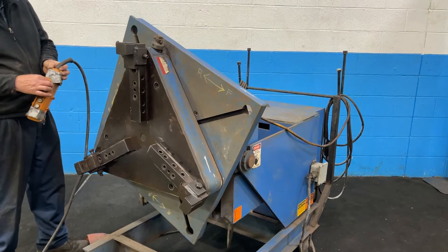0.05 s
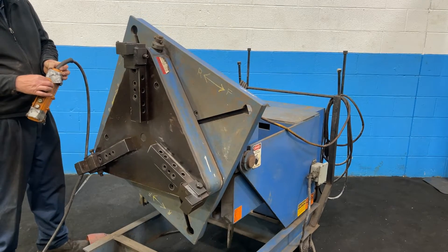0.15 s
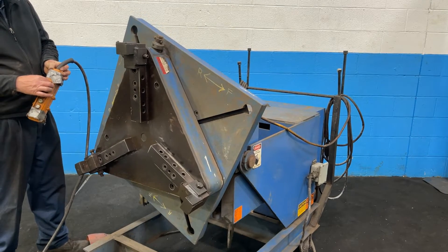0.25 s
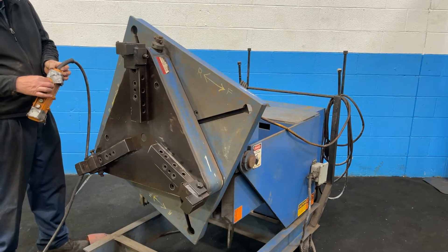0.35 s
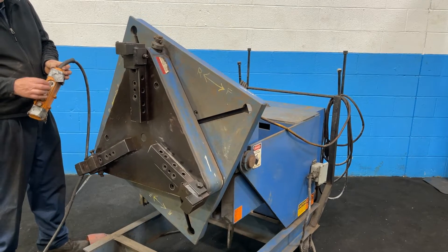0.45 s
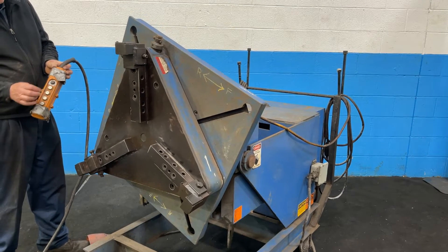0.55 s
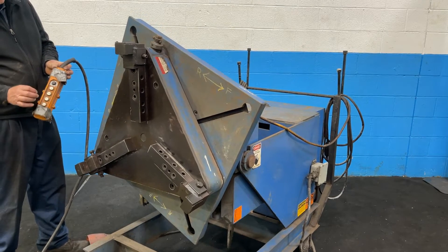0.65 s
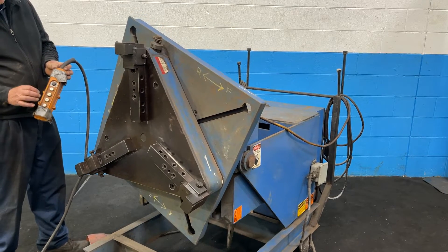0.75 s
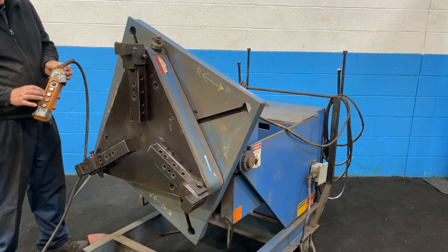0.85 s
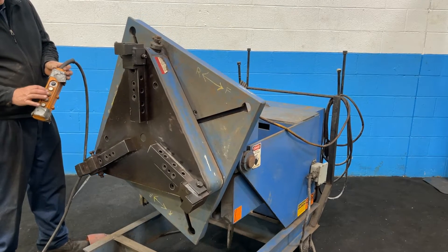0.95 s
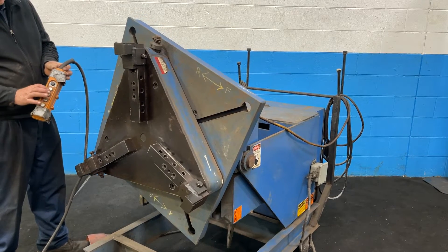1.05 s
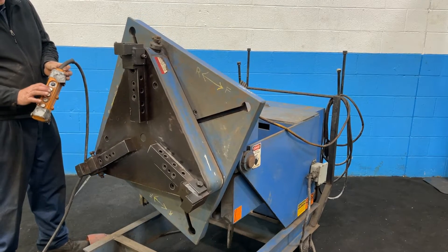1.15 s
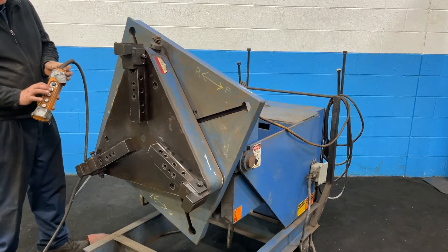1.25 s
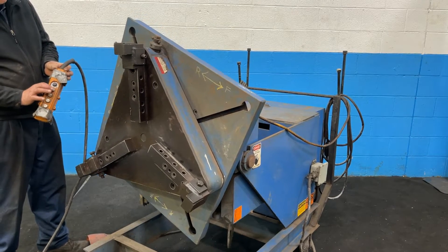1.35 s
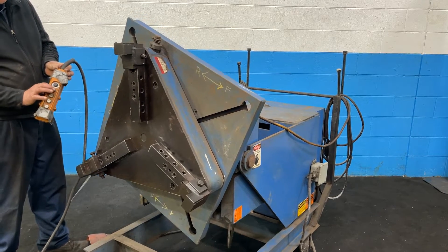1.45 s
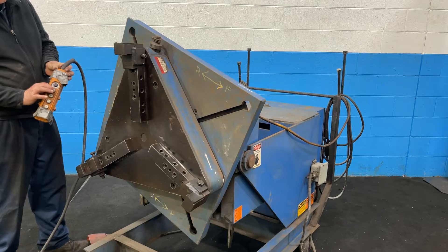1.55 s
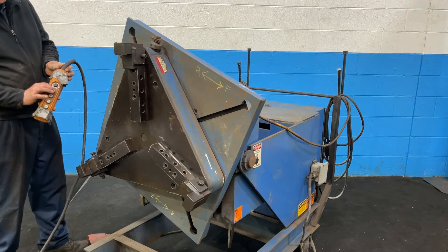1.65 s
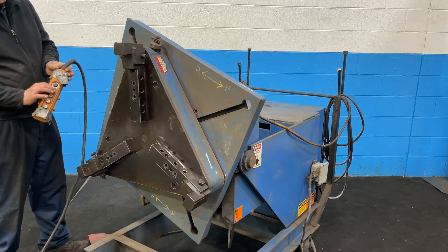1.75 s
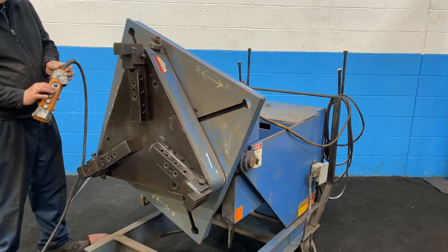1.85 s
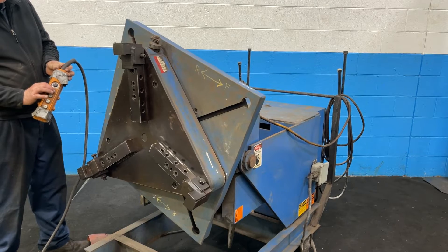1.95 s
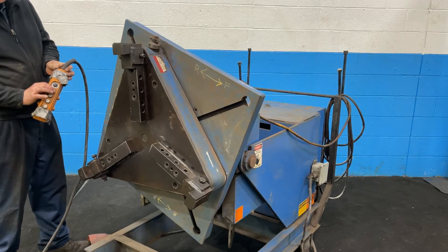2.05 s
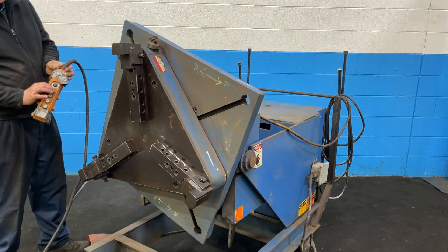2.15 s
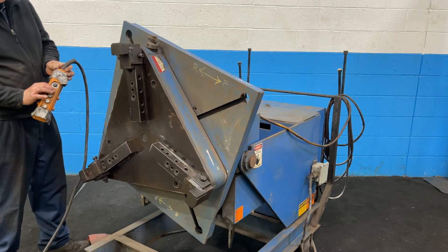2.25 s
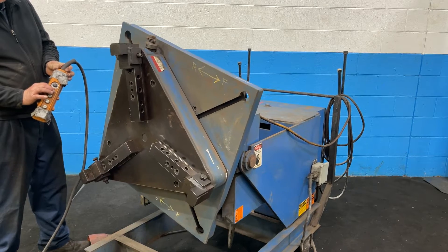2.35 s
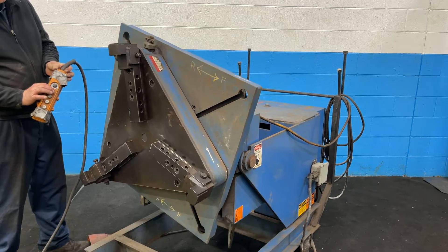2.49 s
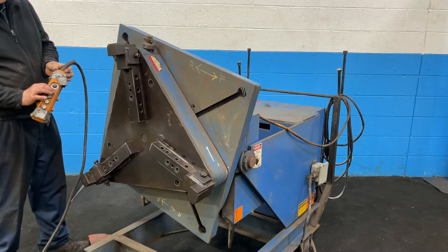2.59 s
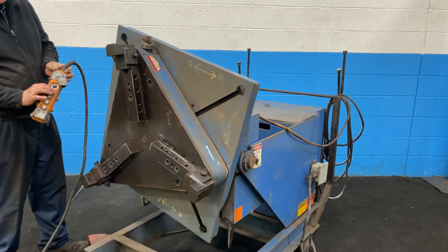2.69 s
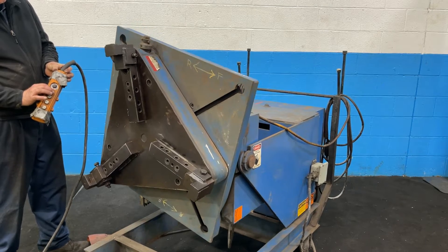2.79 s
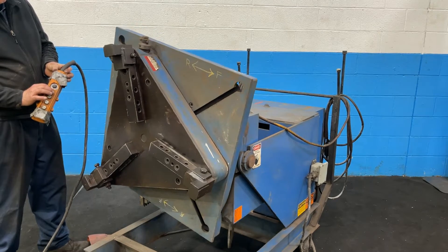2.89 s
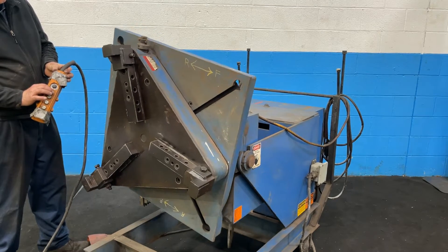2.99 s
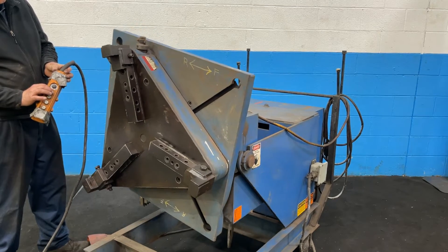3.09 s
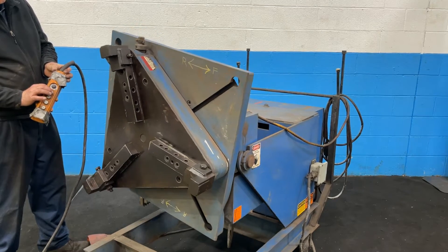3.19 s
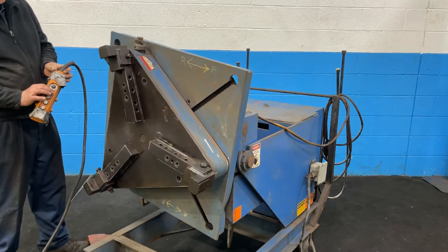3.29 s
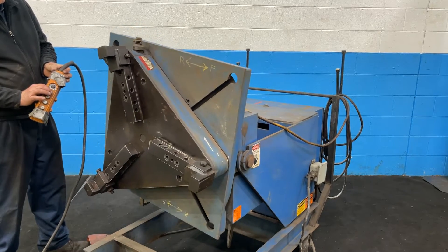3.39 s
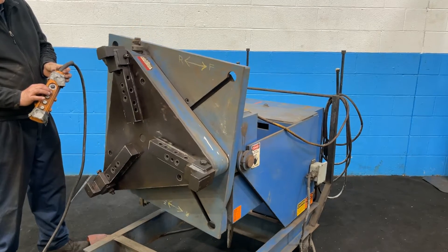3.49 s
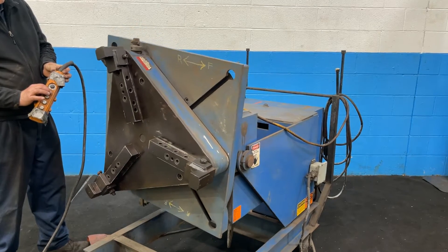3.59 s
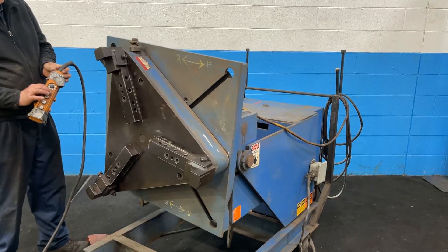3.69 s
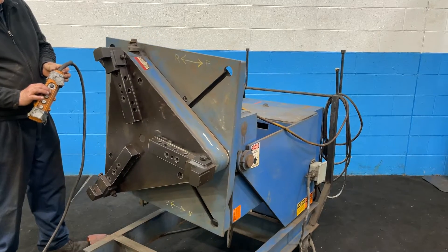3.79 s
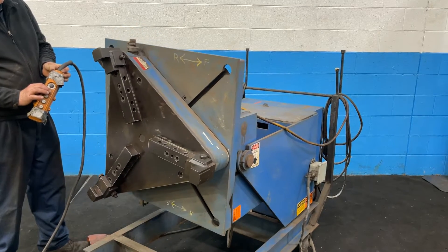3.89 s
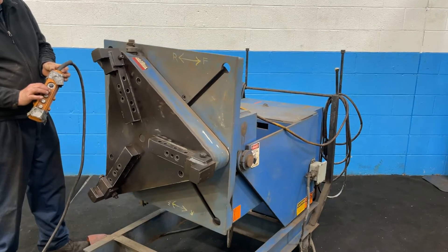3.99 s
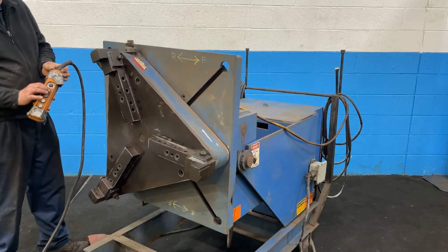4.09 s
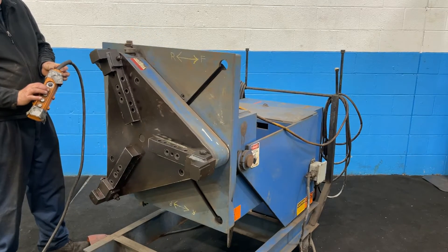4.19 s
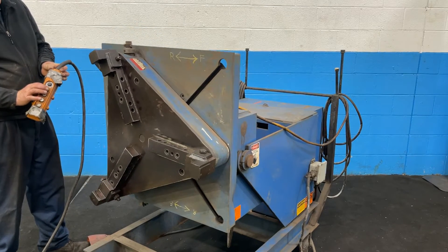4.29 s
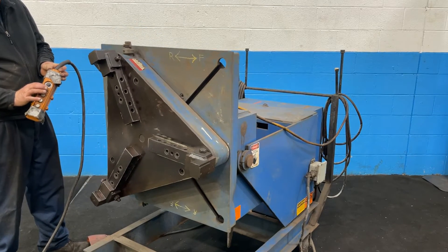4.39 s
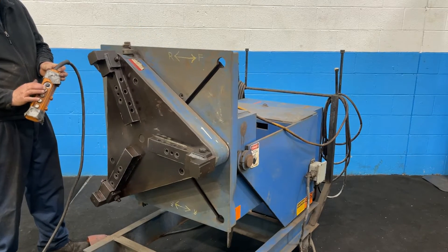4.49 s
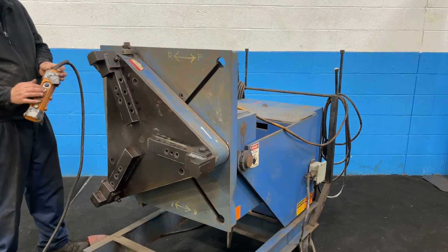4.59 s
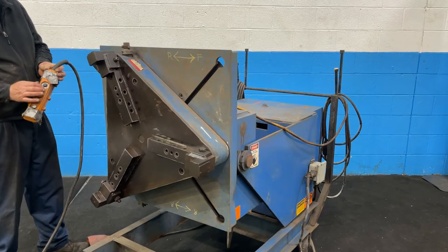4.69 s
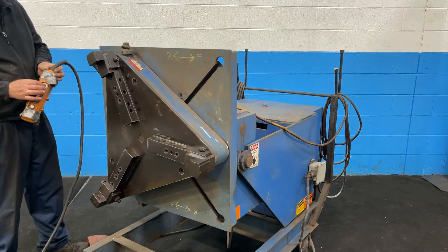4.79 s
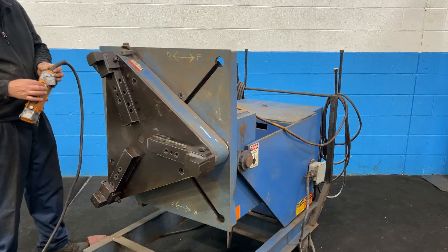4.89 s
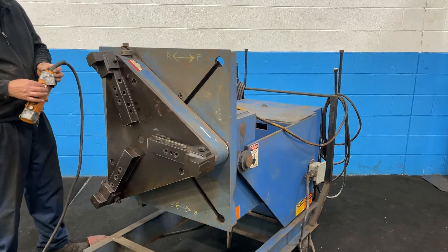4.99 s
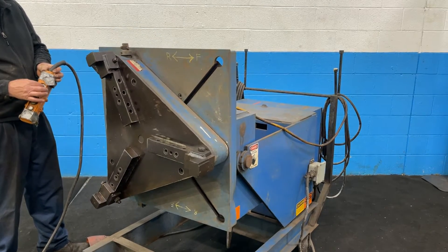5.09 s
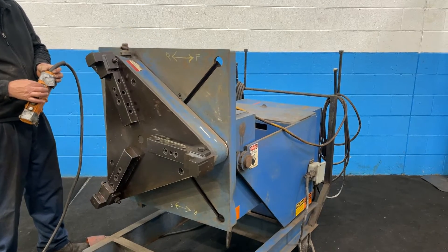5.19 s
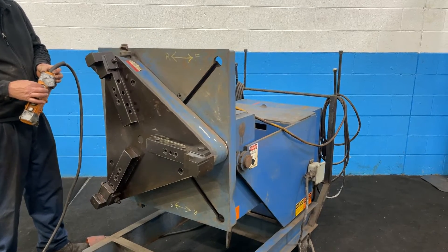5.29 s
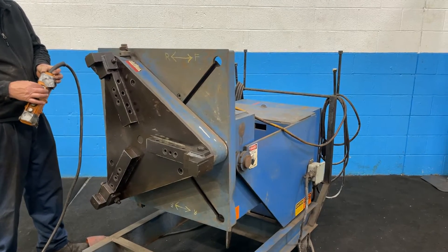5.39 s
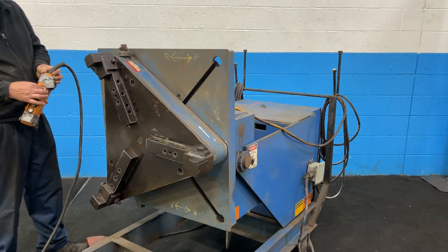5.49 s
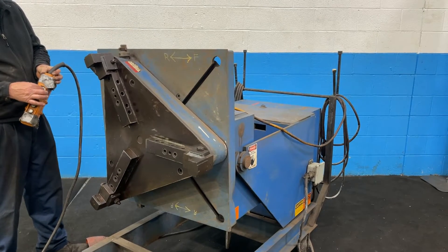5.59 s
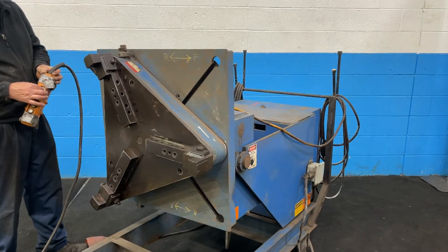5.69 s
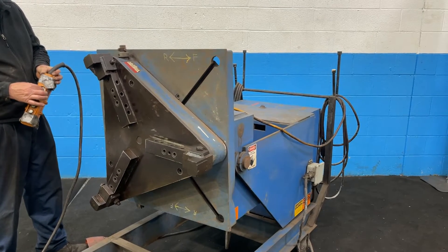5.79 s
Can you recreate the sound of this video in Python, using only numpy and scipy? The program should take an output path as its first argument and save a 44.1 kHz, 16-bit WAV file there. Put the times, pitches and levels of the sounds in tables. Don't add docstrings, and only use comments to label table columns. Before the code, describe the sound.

Close to a stereo microphone in a hard-walled workshop, a motor drive hums low and steady over soft hall rumble. Faint air hiss and thin distant squeaks come early. After a small click the gears whine upward, metal chatter swells and holds steady, then the pitch slides down and the rattle fades to idle hum.

```python
import sys
import numpy as np
from scipy import signal
from scipy.fft import rfft, irfft, next_fast_len
from scipy.io import wavfile
from scipy.ndimage import uniform_filter1d

SR = 44100
rng = np.random.default_rng(int(sys.argv[2]) if len(sys.argv) > 2 else 0)


def boost(x):
    u = np.asarray(x, float) / 20
    return 10 ** u


def to_wav(sig):
    pcm = np.clip(np.atleast_2d(sig), -1, 1) * 32767
    pcm = np.round(pcm).astype(np.int16)
    wavfile.write(sys.argv[1], SR, pcm.T)


N = 257975
T = np.arange(N) / SR
SIZE = next_fast_len(N + SR)
HZ = np.arange(SIZE // 2 + 1) * SR / SIZE + 1e-3

# (time [s], level of the first ripple line [dB])
RIPPLE = [(0, -41), (1.6, -40.5), (1.69, -37.5), (1.82, -34.5), (1.9, -29.5), (2.25, -30.5), (2.32, -35),
          (2.41, -31), (4.2, -32.5), (4.28, -41), (4.5, -54), (4.92, -57.5), (4.975, -33.5), (5.005, -33.5),
          (5.045, -49), (5.1, -37), (5.2, -42), (5.85, -40.5)]
# (multiple of the ripple rate, level re first line [dB])
BUZZ = [(4, -19.5), (5, -37.5), (7, -41), (10, -55), (11, -31), (12, -33), (13, -32.5), (14, -31.5),
        (15, -30.5)]
# (time [s], level over idle [dB])
CONTACT_FORCE = [(0, 1), (.6, 1.5), (1.1, -1.8), (1.6, 1.5), (1.69, 6), (1.87, 14), (2.1, 18.5), (2.3, 22),
                 (2.85, 23), (4.2, 21.5), (4.3, 18.5), (4.43, 14), (4.71, 5.5), (4.87, 1), (5.0, 1.6),
                 (5.85, 0.3)]
# (idle level [dB], rise per force [dB/dB], extra while gears are loose [dB],
# unevenness at rest [dB], unevenness under load [dB])
CASING_PARTS = [
    (-53, 0.895, 8.5, 1, 1.8),
    (-51.5, 0.8719, 5.5, 1.4, 0.86),
    (-53.5, 1.0349, 0.9, 1.5, 0.65),
]
# (frequency [Hz], width [Hz], level [dB])
FRAME_RINGS = [(94, 34, -8), (166, 19, -15), (249.8, 22, 5), (312, 41, -2.5), (394, 26, -3.5),
               (412, 104, -3.5), (481, 16, -7), (516, 62, 1), (553, 60, -6.5)]
# (frequency [Hz], width [Hz], level [dB])
HOUSING_RINGS = [(657, 21, -6), (718, 17, -1), (746, 19, 0), (769, 5.4, 3), (799, 6.7, 8), (840.5, 7.4, 1),
                 (920, 22, -11), (943, 53, -8.5), (1006, 37, -12.5), (1038, 18, -8), (1105, 28, -15),
                 (1205, 34, -18.5), (1314, 15, -15), (1410, 17, -18)]
# (frequency [Hz], width [Hz], level [dB])
COVER_RINGS = [(2770, 70, -11), (2905, 40, -13), (3090, 30, -17), (3190, 30, -6), (3280, 50, -13),
               (3510, 40, -11), (3642, 25, -2), (3715, 40, -3), (3762, 25, 1), (3817, 25, 1),
               (3930, 70, -10), (4080, 30, -15), (4210, 30, -17), (4420, 80, -12), (4510, 51, -16),
               (4650, 50, -18), (4740, 50, -16), (5445, 110, -16), (5742, 35, -15), (6030, 30, -17),
               (6136, 25, -12), (8220, 50, -15), (8322, 40, -14), (8470, 60, -14), (8660, 60, -12),
               (8810, 45, -11), (9160, 30, -13), (9420, 50, -15)]
# (frequency [Hz], level per Hz [dB])
CONTACT_HISS = [(1000, -42), (1400, -25.5), (2300, -26), (2800, -16.5), (4300, -20), (4950, -22),
                (7300, -25.5), (8500, -17), (9400, -19.5), (10400, -19.5), (11000, -29.5), (12300, -34.5),
                (12700, -44), (14000, -60)]
# (frequency [Hz], level per Hz [dB])
HALL_SPECTRUM = [(15, -45), (28, -29), (55, -6), (100, -6.5), (180, -11.5), (400, -18.5), (800, -20.5),
                 (1300, -34), (2300, -31.5), (5000, -38.5), (9000, -41), (10500, -39), (11500, -56),
                 (14000, -70)]
# (time [s], level [dB], centre [Hz], width [Hz], 60 dB decay [s])
PUFFS = [
    (0.243, -49.5, 9100, 3000, 0.66),
    (.26, -50.5, 1100, 2300, 0.66),
    (0.25, -50, 7000, 1400, 0.23),
    (5.8, -52.5, 8300, 1500, 0.69),
    (1.585, -47, 7700, 7400, 0.062),
    (1.66, -61, 7000, 8000, .08),
    (4.95, -62, 6000, 7000, 0.09),
]
# (time [s], length [s], start [Hz], end [Hz], level [dB])
SQUEAKS = [
    (0.354, .2, 13180, 13160, -62),
    (0.491, 0.13, 10550, 9140, -43),
    (0.551, 0.19, 9320, 9170, -45.5),
    (0.577, .17, 4650, 4620, -55),
    (0.6, 0.184, 8650, 8100, -57),
    (1.39, 0.27, 3710, 3743, -50.5),
    (1.394, 0.51, 7430, 7500, -66),
]
# (time [s], gear tooth rate [Hz])
TOOTH_RATE = [(1.64, 99.95), (1.8, 187.6), (1.95, 249.7), (2.06, 303.8), (2.23, 383), (2.44, 451.8),
              (2.55, 475), (2.72, 480.9), (3.04, 482), (3.8, 481), (4.19, 481.7), (4.23, 462.8),
              (4.28, 407.2), (4.36, 337.7), (4.48, 271.5), (4.7, 174), (4.82, 120)]
# (tooth rate [Hz], width [Hz], level [dB])
WHINE_SWELLS = [(248, 14, -27.5), (304, 22, -27), (388, 40, -28), (430, 40, -34), (480, 24, -19.2)]
# (frequency [Hz], width [Hz], level [dB])
OCTAVE_SWELLS = [(810, 50, -35), (840, 51, -40)]
# (time [s], dip [dB], length [s])
WHINE_DIPS = [(2.138, 9, .02), (2.203, 17, .02), (2.51, 16, .04), (2.655, 9, 0.012), (2.785, 13, .025),
              (2.874, 4, .02), (4.24, 18, 0.014), (4.34, 12, .02), (4.444, -1, 0.013), (4.514, 18, 0.016),
              (4.63, 5, .045)]
# (multiple of tooth rate, level re steady whine [dB])
GEAR_TONES = [(.29, -26), (0.62, -23), (.667, -34), (1.365, -31), (1.451, -32), (1.59, -22), (1.667, -19),
              (1.955, -23), (2.667, -34.5)]
# (frequency [Hz], correlation)
PORT_LIKENESS = [(60, .98), (500, .97), (750, .78), (2400, .66), (3300, .72), (3800, .92), (4300, .65),
                 (5000, .4), (6900, .2), (8500, .99), (9200, .8), (10250, 1), (11200, .55), (11750, 1)]
# (frequency [Hz], level [dB])
PORT_BALANCE = [(60, 16.5), (130, -2.5), (250, -2.5), (480, 2.5), (750, -3.5), (1100, 2.5), (2500, -1),
                (3300, 1), (4000, -1), (6700, 4), (8000, 1.5), (9000, 1)]
# (frequency [Hz], phase [rad])
PORT_LEAD = [(60, 0), (500, -.2), (750, .8), (1400, 0), (2200, .1), (3100, 1.1), (4100, .4), (4900, 2.2),
             (5600, .6), (7800, .9), (8600, 0), (10250, -np.pi), (11000, -4.3), (11700, -2 * np.pi)]
# (frequency [Hz], threshold [dB])
TREBLE_GATE = [(7900, -130), (8000, -102), (10000, -100.5), (12000, -89.5), (13500, -82)]


def unit(x):
    return x / np.sqrt(np.mean(x ** 2))


def curve(table):
    return np.interp(T, *np.transpose(table))


def over_hz(table):
    hz, value = np.transpose(table)
    return np.interp(np.log(HZ), np.log(np.maximum(hz, 20)), value)


def shape(x, response):
    return irfft(rfft(x, SIZE) * response, SIZE)[..., :N]


def walk(rate):
    k = int(SR / rate)
    steps = np.repeat(rng.standard_normal(N // k + 1), k)
    slewed = uniform_filter1d(uniform_filter1d(steps, k), k)
    return unit(slewed[:N])


def resonances(modes):
    power = 0
    for hz, width, db in modes:
        detuning = (HZ / hz - hz / HZ) * hz / width
        power = power + boost(2 * db) / (1 + detuning ** 2) ** 1.33
    return np.sqrt(power)


def speed_and_slack():
    hz = curve(TOOTH_RATE)
    starting = np.clip((T - TOOTH_RATE[0][0]) / 0.13, 0, 1)
    stopping = np.clip((TOOTH_RATE[-1][0] - T) / 0.062, 0, 1)
    loose = np.clip(-12 * np.log10(hz / hz.max()), 0, 1)
    return hz, starting * stopping, loose


def motor_hum():
    ripple_hz, second_lag_s = 120.1, 0.08
    first_db = curve(RIPPLE)
    settled_db = uniform_filter1d(first_db, int(second_lag_s * SR))
    second_db = -40.5 + 0.53 * (settled_db - RIPPLE[0][1])
    second_db += 0.55 * np.minimum(settled_db + 45, 0)
    second_db += 2 * walk(12)
    first_db = first_db + 0.56 * walk(14)
    phase = 2 * np.pi * ripple_hz * T
    out = boost(first_db) * np.sin(phase) + boost(second_db) * np.sin(2 * phase + 0.53)
    buzz_db = -38.5 + 0.53 * (first_db + 37.5)
    for k, db in BUZZ:
        line_db = buzz_db + db + 1.9 * walk(6.3)
        out += boost(line_db) * np.sin(k * phase + rng.uniform(0, 2 * np.pi))
    return np.sqrt(2) * out


def knocks(per_s, fade_s, spread_db):
    force = boost(spread_db * rng.standard_normal(N))
    hits = (rng.random(N) < per_s / SR) * force / per_s
    fading = signal.lfilter([1], [1, -np.exp(-1 / (fade_s * SR))], hits)
    fading = fading / fading.mean()
    return 1.15 * fading / (.2 + uniform_filter1d(fading, size=2200))


def casing_chatter():
    full_force_db, run_up_share = 16, 0.52
    force_db = curve(CONTACT_FORCE)
    hz, on, loose = speed_and_slack()
    coasting = T > T[np.argmax(hz)]
    rattle = uniform_filter1d(on * loose * np.where(coasting, 1, run_up_share), size=SR // 8)
    load = np.clip(force_db / full_force_db, 0, 1)
    levels = []
    for idle_db, per_db, loose_db, rest_db, load_db in CASING_PARTS:
        uneven_db = rest_db + (load_db - rest_db) * load
        levels.append(idle_db + per_db * force_db + loose_db * rattle + uneven_db * walk(13))
    frame_db, housing_db, covers_db = levels
    knock = knocks(np.interp(covers_db, [-52, -32], [70, 130]), fade_s=.006, spread_db=2.0)
    contacts = rng.standard_normal((4, 2, N))
    frame_gain = resonances(FRAME_RINGS) / (1 + (HZ / 580) ** 8) / (1 + (60 / HZ) ** 4)
    frame = unit(shape(contacts[0], frame_gain))
    housing_gain = resonances(HOUSING_RINGS) / (1 + (HZ / 1500) ** 6) / (1 + (620 / HZ) ** 8)
    housing = unit(shape(contacts[1], housing_gain))
    cover_gain = resonances(COVER_RINGS) / (1 + (2500 / HZ) ** 8) / (1 + (HZ / 9900) ** 30)
    ringing = shape(contacts[2] * (1 + (.48 - .2 * load) * (knock - 1)), cover_gain)
    hiss = shape(contacts[3] * (.87 + .13 * knock), boost(over_hz(CONTACT_HISS)))
    out = boost(frame_db - 2.0) * frame + boost(housing_db) * housing
    return out + boost(covers_db + 0.5) * unit(ringing + hiss)


def hall_rumble():
    response = boost(over_hz(HALL_SPECTRUM)) * (HZ < 14000)
    noise = unit(shape(rng.standard_normal((2, N)), response))
    return boost(-45 + 1.9 * walk(3.08)) * noise


def air_puffs():
    out = np.zeros((2, N))
    for s, db, hz, width, t60 in PUFFS:
        after = np.maximum(T - s, 0)
        burst = (1 - np.exp(-after / 0.0019)) * boost(db - 60 * after / t60)
        noise = shape(rng.standard_normal((2, N)), resonances([(hz, width, 0)]))
        out += burst * unit(noise)
    return out


def brake_squeaks():
    out = np.zeros((2, N))
    wobble = np.array([walk(150), walk(150)])
    for s, length, hz0, hz1, db in SQUEAKS:
        u = np.clip((T - s) / length, 0, 1)
        wobble_hz = 0.00206 * hz1 + 0.08 * abs(hz1 - hz0)
        hz = hz0 + (hz1 - hz0) * u + wobble_hz * wobble
        swell = np.sin(np.pi * u ** .5)
        out += boost(db) * swell * np.sin(2 * np.pi * np.cumsum(hz, axis=1) / SR)
    return out


def gear_whine():
    hz, on, loose = speed_and_slack()
    dip_db = sum(db * np.exp(-((T - s) / length) ** 2) for s, db, length in WHINE_DIPS)
    whine = np.interp(hz, HZ, resonances(WHINE_SWELLS)) * boost(-dip_db)
    phase = 2 * np.pi * np.cumsum(hz) / SR
    speed = np.log10(hz / hz.max())
    phase += .7 * loose * walk(45)
    out = whine * boost((.5 + 2.7 * loose) * walk(30.08)) * np.sin(phase)
    octave_floor = boost(-43.0 + 59 * np.minimum(speed + 0.044, 0))
    octave = np.hypot(octave_floor, np.interp(2 * hz, HZ, resonances(OCTAVE_SWELLS)))
    out += octave * boost(1.4 * walk(16)) * np.sin(2 * phase + 0.52 * walk(14))
    for k, db in GEAR_TONES:
        tone_db = -19.5 + 260 * speed + db + 2.2 * walk(9)
        out += boost(tone_db) * np.sin(k * phase + .5 * walk(10) + rng.uniform(0, 2 * np.pi))
    return np.sqrt(2) * on * out


def echo(x):
    t60_s, gap_s = 0.45, .01
    t = np.arange(SR) / SR
    tail = rng.standard_normal((2, SR)) * boost(-60 * t / t60_s) * (t > gap_s)
    tail /= np.sqrt(np.sum(tail ** 2, axis=1, keepdims=True))
    return shape(x, rfft(tail, SIZE))


def microphone_ports(direct, diffuse):
    alike = np.clip(over_hz(PORT_LIKENESS), 0, 1)
    half = boost(over_hz(PORT_BALANCE) / 2) * np.exp(.5j * over_hz(PORT_LEAD))
    spread = np.array([half, 1 / half])
    side = np.array([[1], [-1]])
    shared = shape(direct, spread * np.sqrt((1 + alike) / 2))
    return shared + shape(diffuse, side * spread * np.sqrt((1 - alike) / 2))


def scene():
    tones = motor_hum() + gear_whine()
    distant = air_puffs() + brake_squeaks()
    trail = echo(tones)
    direct, diffuse = casing_chatter() + distant + 0.69 * echo(distant) + hall_rumble()
    return microphone_ports(tones + .08 * trail[0] + direct, .9 * trail[1] + diffuse)


def low_pass(x):
    return signal.sosfilt(signal.butter(12, 13170, fs=SR, output="sos"), x)


def record(dry):
    pair = np.array([[1, 0.99], [1, -1.032]])
    hz, _, z = signal.stft(pair @ dry / 2, SR, nperseg=2048)
    hz = hz[4:1024:8, None]
    power = (np.abs(z[:, :1024].reshape(2, 128, 8, -1)) ** 2).mean(axis=2)
    power = uniform_filter1d(power, size=3, axis=1)
    loud = power[:, 20:50].mean(axis=(0, 1))
    limit = boost(2 * np.interp(hz, *np.transpose(TREBLE_GATE)))
    limit = limit + (hz > 9900) * boost(-2 * 19) * loud
    masked = (hz > 5500) * boost(-2 * 12) * power[::-1]
    z[:, :1024] *= np.repeat(power > limit + masked, 8, axis=1)
    mix = pair @ signal.istft(z, SR, nperseg=2048)[1][:, :N]
    return low_pass(mix)


dry = scene()
out = record(dry)
to_wav(out)
```